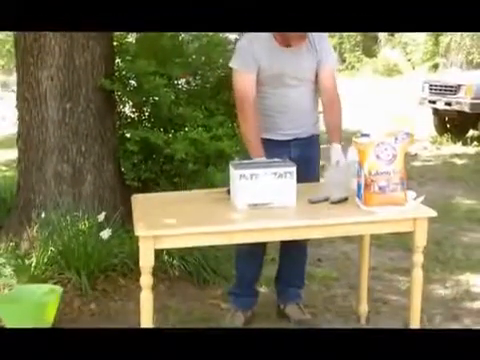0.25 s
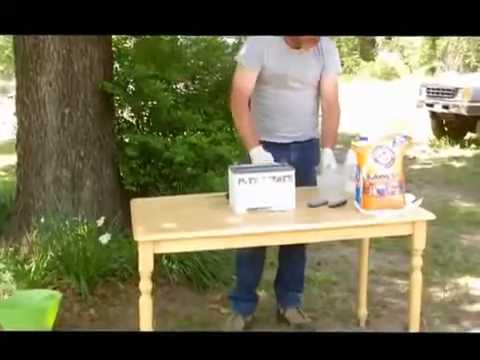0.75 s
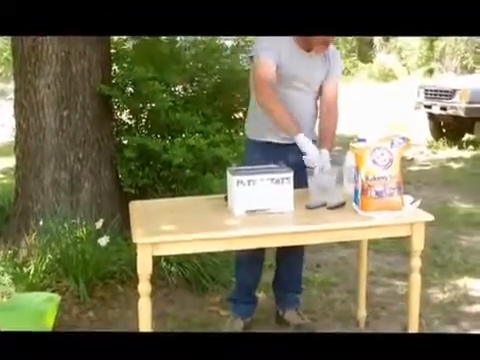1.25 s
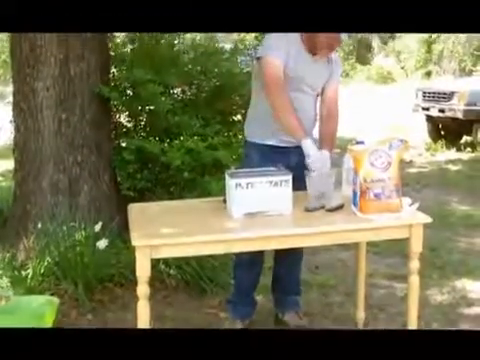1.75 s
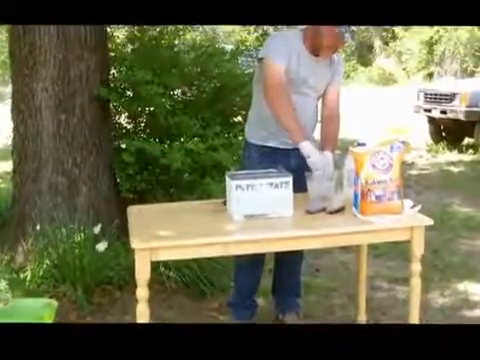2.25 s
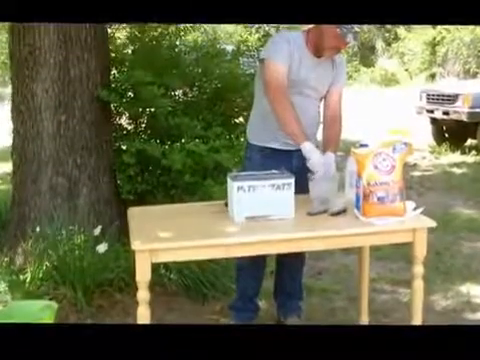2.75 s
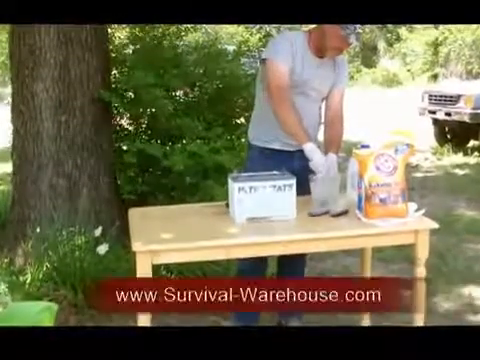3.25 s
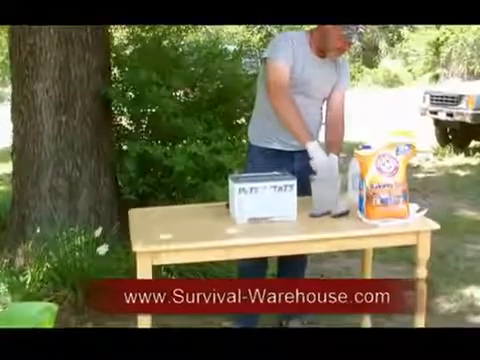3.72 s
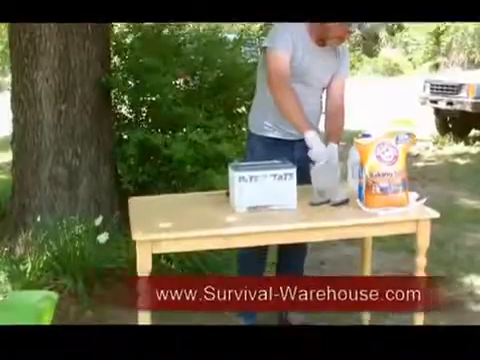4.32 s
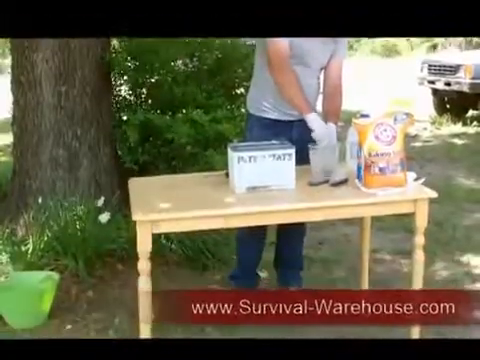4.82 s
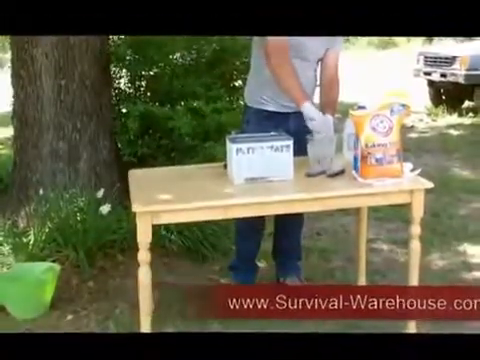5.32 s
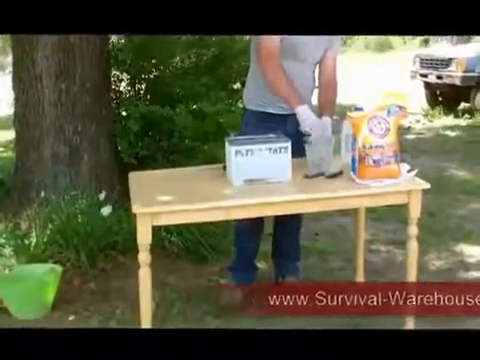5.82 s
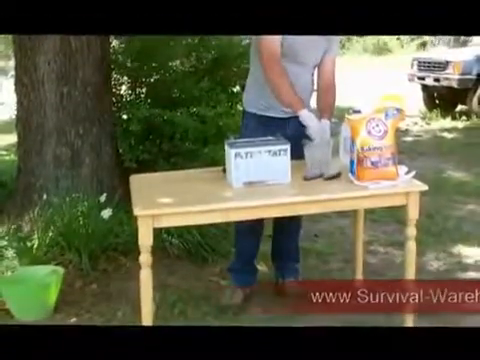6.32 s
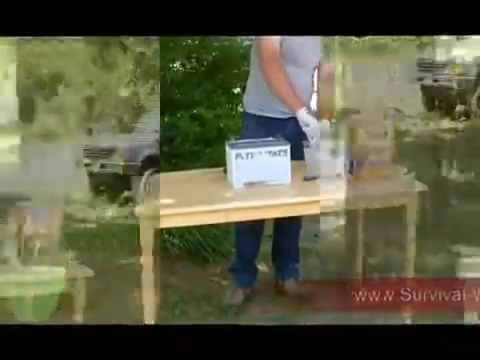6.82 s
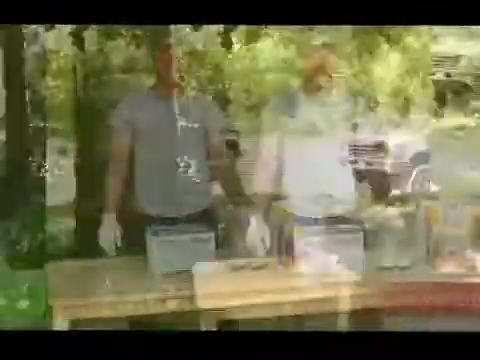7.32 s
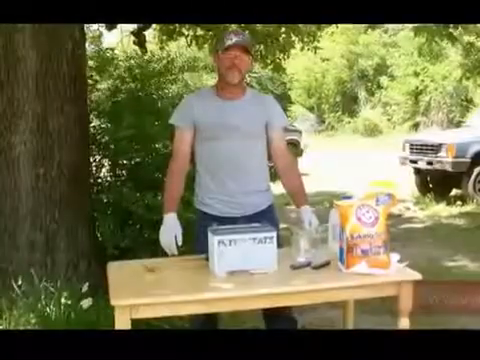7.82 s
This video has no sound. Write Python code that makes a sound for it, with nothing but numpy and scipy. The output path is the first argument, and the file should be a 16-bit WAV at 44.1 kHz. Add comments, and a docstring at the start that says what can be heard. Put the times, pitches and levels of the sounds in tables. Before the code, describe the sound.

A faint wooden scrape and a dull rattling knock lead into busy stirring: a spoon strikes the inside of a wet glass jar irregularly, grinding undissolved grains and making plops and gliding bubble tones. The sound is close, dry and slightly dull, outdoors with little echo, and heard on the left. Steady yard noise, hiss and a faint fluttering buzz continue underneath, quieter after the stirring is abruptly cut near the end.

```python
"""Outdoors in a yard: a spoon knocks and drags on a wooden table, then stirs a water-filled glass jar.
Filtered grit and noise knocks give the table; from 1.4 s decaying modes give clinks and glass rings,
gliding tones give bubbles, and grit through the clink modes gives the rub along the glass.
At 7.1 s a cut leads to a quieter moment with no stirring. One microphone feeds the left channel only;
yard noise lies behind it, and both channels carry the camera's hiss and a buzz at its frame rate."""
import sys
import numpy as np
from scipy import signal
from scipy.fft import rfft, irfft
from scipy.io import wavfile
from scipy.ndimage import uniform_filter1d

SR = 44100
rng = np.random.default_rng(int(sys.argv[2]) if len(sys.argv) > 2 else 0)


def pcm_store(signal):
    """Save signal as 16-bit PCM."""
    levels = np.round(np.clip(np.atleast_2d(signal), -1, 1) * 32767)
    wavfile.write(sys.argv[1], SR, levels.astype(np.int16).T)


N = 355446
TIME = np.arange(N) / SR
CUT_S = 7.103

# Source levels are settings ahead of the layer gains and the microphone.
# yard background, spectral shape: hz [Hz], density_db [dB per Hz, relative]
YARD_SPECTRUM = [(59, -43), (100, -44), (514, 0), (709, -7), (1050, -3), (1130, -49), (1780, -35),
                 (2000, -3.5), (9000, -30.5), (11700, -53), (19800, -120)]
YARD_DB, YARD_AFTER_DB = -67, -70.5  # before and after the cut
# camera hiss, spectral shape: hz [Hz], density_db [dB per Hz, relative]
HISS_SPECTRUM = [(25, -14), (60, -11), (130, -9), (300, -3.5), (1000, 0), (3000, -5), (6000, -7),
                 (10000, -8), (14800, -10), (15600, -59), (16400, -40)]
HISS_DB, HISS_AFTER_DB, HISS_LEFT_DB = -62, -64, -1  # left is relative to right
HISS_SHARED = 0.45  # share of hiss power common to both channels
# resonances of the camera buzz: centre_hz [Hz], width_hz [Hz], level_db [dB]
BUZZ_MODES = [(242, 92, 1.5), (528, 590, 14), (930, 1750, 3.5), (2200, 2600, -7)]
FRAME_HZ = 29.968
BUZZ_START_S, BUZZ_START_AFTER_S = .0237, .0028  # offset of the bursts before and after the cut
BUZZ_DB, BUZZ_AFTER_DB, BUZZ_LEFT_DB = -63, -65, -6  # left is relative to right

# spoon strokes over the table: start_s [s], full_from_s [s], full_until_s [s], end_s [s], level_db [dB]
DRAG_STROKES = [(0.293, 0.36, 0.37, 0.47, -50.5), (0.45, 0.54, 0.55, 0.61, -55),
                (0.65, 0.69, 0.66, 1.01, -54.5), (0.743, 0.85, 1.01, 1.8, -52.5)]
DRAG_SWELL_DB = 22.5  # how far a stroke lies below full at its start and end
# resonances of the dragged table top: centre_hz [Hz], width_hz [Hz], level_db [dB]
TABLE_MODES = [(367, 290, -4), (510, 304, 8.5), (830, 910, -3), (1180, 98, 2.5), (1770, 81, 0.5),
               (2400, 38, 2), (3340, 450, -5), (5400, 1200, -10)]
# knocks on the table: start_s [s], level_db [dB peak], t60_s [s]
TABLE_KNOCKS = [(0.408, -60, 0.075), (0.626, -31, 0.055), (0.666, -38, 0.059), (0.679, -46, 0.056)]
# resonances of the knocked wood: centre_hz [Hz], width_hz [Hz], level_db [dB]
KNOCK_MODES = [(450, 160, 24.5), (950, 250, 22.5), (1390, 160, 12), (2100, 130, 3), (3340, 400, -4)]
# thin faint tones, the low one perhaps the spoon singing: start_s [s], end_s [s], kind, level_db [dB]
WHISTLE_TONES = [(0.35, .42, "high", -77), (0.538, 0.733, "high", -63), (1.384, 1.52, "low", -59),
                 (1.629, 1.772, "low", -58), (1.883, 1.957, "low", -61), (3.423, 3.48, "low", -75),
                 (3.612, 3.733, "low", -55), (3.87, 3.947, "low", -52.5), (4.099, 4.18, "low", -52)]
# pitch of each kind of thin tone: kind, pitch_hz [Hz]
WHISTLE_HZ = {"low": 2420, "high": 6720}

# single large bubbles: start_s [s], level_db [dB peak], pitch_hz [Hz], end_over_start [ratio], t60_s [s]
LARGE_BUBBLES = [(1.541, -30, 2627, 0.99, 0.084), (1.575, -36, 2660, 0.95, 0.094),
                 (2.03, -20.5, 1636, 0.74, 0.022), (2.065, -22, 1537, 0.97, 0.038),
                 (2.149, -39, 1084, 0.98, .06), (2.479, -35, 1750, 0.85, 0.025),
                 (2.559, -32.5, 1680, 0.88, 0.024), (2.589, -38.5, 2280, 1.1, 0.041),
                 (2.6, -36, 1044, 1.05, 0.06), (2.635, -39, 1030, 0.96, .05),
                 (2.747, -31, 1116, 0.85, 0.042), (2.863, -33, 450, 1, 0.059),
                 (2.926, -14.5, 747, 3.64, 0.09), (2.984, -32.5, 632, 0.94, 0.07),
                 (3.025, -38, 1174, 0.9, .06), (3.078, -38, 627, 1.02, .06),
                 (3.297, -28.5, 1070, 1.1, 0.041), (3.395, -26.5, 588, 0.79, 0.062),
                 (4.115, -24.5, 950, 1.6, 0.083), (4.176, -25.5, 894, 1.54, 0.056),
                 (4.228, -35, 2100, 2, 0.023), (4.255, -36, 2720, 0.82, 0.036),
                 (4.301, -18, 1860, 0.86, 0.032), (4.46, -28, 1200, 0.83, 0.044),
                 (4.646, -29, 958, 1.15, 0.093), (4.781, -25.5, 1815, 1.3, 0.034),
                 (5.063, -29.5, 2020, 0.79, 0.02), (5.096, -19.5, 2200, 1.4, 0.012),
                 (5.16, -30.5, 1750, 1.2, 0.027), (5.18, -28, 1680, 0.75, 0.035),
                 (5.207, -19, 950, 1.46, 0.053), (5.33, -39.5, 567, 0.92, 0.14),
                 (5.511, -33, 1390, 0.81, 0.035), (5.545, -39, 1600, 1.1, 0.043),
                 (5.565, -35.5, 1750, .95, 0.032), (6.213, -26, 680, 0.87, 0.064),
                 (6.48, -28, 1087, 1.4, 0.073), (6.51, -30, 1127, 1.08, 0.055),
                 (6.532, -34, 1140, 1.02, .04), (6.656, -30.5, 620, 1.83, 0.058),
                 (6.799, -44, 1544, 0.65, 0.12), (6.828, -22.5, 2400, 1.3, 0.02),
                 (6.98, -16, 995, 1.11, 0.072), (7.004, -30.5, 1210, 3.9, 0.044),
                 (7.054, -38, 2000, 1.05, 0.033), (7.075, -34, 1540, 1.3, 0.043)]
# effort of the stirring hand: time_s [s], gurgle_db [dB], rub_db [dB]
STIR_EFFORT = [(1.4, -62, -74), (1.55, -53.5, -54), (1.9, -65, -78), (2.0, -49, -55), (2.35, -68, -69),
               (2.65, -60.5, -54), (3.0, -47, -93), (3.2, -62.5, -63), (3.45, -49.5, -61),
               (3.75, -58, -56.5), (4.0, -61, -59), (4.1, -52, -56), (4.3, -50.5, -54.5), (4.5, -69, -58),
               (5.0, -58, -68), (5.3, -57.5, -56), (5.83, -56, -68), (6.2, -73, -83), (6.5, -57.5, -55),
               (6.93, -57, -73), (7.04, -51, -65), (7.1, -52, -51)]
# long modes of the glass wall: pitch_hz [Hz]
WALL_MODE_HZ = [845, 2162]
# their die-away: t60_s [s]
WALL_MODE_T60_S = [0.58, 0.23]
# tuning of the wall through the stirring: time_s [s], pitch_ratio [ratio]
WALL_PITCH = [(1.5, 1.04), (1.75, 1.0), (2.0, 1.003), (2.35, .97), (3.5, .985), (4.5, .965), (7.0, .975)]
# rings of the glass wall: start_s [s], low_mode_db [dB], high_mode_db [dB], free_s [s before damping]
WALL_RINGS = [(1.537, -43, -55, 0.083), (1.575, -47, -39.5, 0.08), (1.782, -33, -61, 0.3),
              (1.946, -35, -31, 0.13), (2.328, -43.5, -35.5, 0.21), (2.443, -44.5, -45, 0.11),
              (3.473, -50, -46, 0.13), (3.76, -40.5, -45, 0.098), (4.075, -36.5, -42, 0.067),
              (4.455, -45, -39, 0.047), (4.561, -65, -38.5, 0.15), (4.811, -48.5, -51, 0.086),
              (5.253, -36, -37, 0.011), (6.235, -40, -57, 0.2), (6.421, -51, -47, 0.11)]
# spoon blows: start_s [s], level_db [dB peak], low_hz [Hz] and high_hz [Hz] favoured modes,
# bass_db [dB] and treble_db [dB] colour, t60_s [s], contact_s [s rise]
SPOON_BLOWS = [(1.368, -30.5, 1520, 6050, -18, -12, 0.039, 0.002),
               (1.536, -29, 2590, 5800, -30, -10.5, 0.034, 0.0016),
               (1.572, -39, 2400, 5960, -26, -7, 0.031, 0.002),
               (1.593, -43, 2110, 4160, -21, -12, 0.051, 0.0022),
               (1.781, -19.5, 1246, 3730, -16.5, -11, 0.041, 0.0022),
               (1.946, -14, 2660, 5820, -30.5, -7, 0.017, 0.0016),
               (1.955, -29, 2196, 3550, -37, -11.5, 0.095, 0.0025),
               (2.031, -36, 1513, 3700, -20, -38, 0.056, 0.002),
               (2.066, -31.5, 1584, 3810, -17, -17, 0.034, 0.0017),
               (2.139, -42.5, 1090, 2880, -10, -14, 0.039, 0.002),
               (2.291, -51, 2320, 4400, 4, 2, 0.021, 0.002),
               (2.328, -13, 1170, 4960, -29.5, -10, 0.027, 0.0019),
               (2.388, -39.5, 1015, 3070, -21, -19, 0.035, 0.0026),
               (2.442, -24, 942, 4720, -14, -9.5, 0.035, 0.0021),
               (2.562, -42.5, 1178, 4900, -22, -33, 0.071, 0.0018),
               (2.846, -34, 950, 6280, -7.5, -12, 0.035, 0.0018),
               (2.921, -27, 930, 3790, -16, -12.5, 0.03, 0.0015),
               (3.073, -38.5, 1160, 3010, -16.5, -20, 0.049, 0.0022),
               (3.173, -42.5, 1480, 3620, -19, -16.5, 0.039, 0.0023),
               (3.276, -38.5, 2590, 3070, -23, -16, 0.094, 0.0024),
               (3.3, -40, 1120, 4850, -31, -19, 0.027, 0.002),
               (3.312, -35, 1224, 3600, -16.5, -19.5, 0.075, 0.0025),
               (3.392, -27.5, 1270, 4850, -11, -15.5, 0.032, 0.0019),
               (3.474, -24, 904, 4780, -18, -11, 0.038, 0.002),
               (3.596, -35.5, 2160, 3730, -12.5, -19, 0.036, 0.0014),
               (3.715, -31.5, 2600, 6630, -30, -22.5, 0.068, 0.0025),
               (3.758, -19.5, 2340, 5150, -13.5, -8, 0.022, 0.0012),
               (3.814, -31, 851, 4840, -21, -3.5, 0.051, 0.0023),
               (3.925, -34, 1042, 5120, -22, -8.5, 0.054, 0.002),
               (3.942, -31, 2276, 3230, -32, -12.5, 0.032, 0.0028),
               (4.066, -36.5, 940, 3460, -12, -8, 0.028, 0.0018),
               (4.075, -26, 1084, 5290, -17, -14.5, 0.062, 0.0014),
               (4.11, -23.5, 965, 2970, -10, -7.5, 0.032, 0.0011),
               (4.166, -26.5, 2700, 5220, -19.5, -9, 0.058, 0.0022),
               (4.22, -27, 2100, 5470, -15.5, -18, 0.032, 0.0032),
               (4.233, -35.5, 2560, 3080, -36, -39, 0.033, 0.0014),
               (4.298, -17, 2040, 4610, -22, -11.5, 0.021, 0.002),
               (4.395, -33, 2560, 6800, -17, -5, 0.033, 0.002),
               (4.41, -25, 1014, 7100, -11.5, -14.5, 0.026, 0.003),
               (4.455, -23.5, 1168, 3370, -12.5, -6.5, 0.034, 0.0017),
               (4.56, -14, 2370, 5440, -18.5, -13, 0.029, 0.0019),
               (4.644, -32.5, 978, 2810, -21, -20.5, 0.058, 0.0048),
               (4.781, -31.5, 1750, 6300, -23, -1, 0.033, 0.0019),
               (4.796, -31, 856, 3540, -10.5, -5, 0.034, 0.002),
               (4.812, -24, 1160, 4990, -16.5, -22, 0.019, 0.0022),
               (4.972, -36.5, 2450, 4470, -18, -12.5, 0.031, 0.002),
               (5.007, -40, 2400, 6310, -19, -11, 0.037, 0.0014),
               (5.063, -45, 2000, 3470, -25, -16, 0.038, 0.002),
               (5.13, -44.5, 1110, 5030, -36, -23, 0.045, 0.0018),
               (5.16, -43.5, 1617, 4770, -22, -34, 0.081, 0.0022),
               (5.211, -26, 1000, 6490, -29.5, -42, 0.02, 0.0016),
               (5.253, -20, 940, 4830, -23.5, -21.5, 0.024, 0.0021),
               (5.295, -38, 991, 3660, 4, -2, 0.053, 0.0026),
               (5.375, -28.5, 2490, 6130, -33, -7, 0.024, 0.0017),
               (5.397, -40, 2250, 3570, -26, -10.5, 0.029, 0.002),
               (5.414, -46, 899, 4730, -34, -36, 0.023, 0.0016),
               (5.506, -42, 1400, 5070, -33, -44, 0.057, 0.002),
               (5.536, -45, 907, 3340, -30, -31, 0.051, 0.0017),
               (5.623, -41.5, 1220, 2980, -35, -15, 0.025, 0.002),
               (5.673, -39.5, 1010, 4800, -27, -12, 0.026, 0.0016),
               (5.684, -38.5, 840, 6500, -29, -9, 0.031, 0.002),
               (5.696, -28.5, 1710, 7200, -33, -22.5, 0.035, 0.0013),
               (5.745, -34.5, 1080, 3820, -14, -18, 0.035, 0.002),
               (5.836, -45.5, 977, 6700, -5, -6, 0.036, 0.0025),
               (5.874, -41.5, 1274, 4130, -19.5, -24, 0.088, 0.0018),
               (5.902, -26.5, 2278, 3650, -28.5, -19.5, 0.025, 0.0017),
               (5.969, -22, 1200, 3550, -16.5, -5.5, 0.028, 0.0021),
               (6.121, -26, 2070, 3050, -17, -7.5, 0.032, 0.0021),
               (6.146, -42, 1670, 4580, -23.5, -11, 0.033, 0.0022),
               (6.213, -25, 905, 3300, -17, -28, 0.018, 0.0021),
               (6.235, -7.5, 2400, 3130, -28.5, -12.5, 0.014, 0.0019),
               (6.281, -32.5, 851, 2940, -19, -18, 0.029, 0.002),
               (6.42, -23.5, 1774, 3750, -27.5, -8.5, 0.034, 0.0023),
               (6.429, -33, 854, 3920, -17, -2, 0.033, 0.0023),
               (6.48, -27.5, 1058, 4920, -41, -34.5, 0.028, 0.0027),
               (6.537, -34.5, 870, 3230, -13, -5, 0.026, 0.0018),
               (6.548, -48, 1150, 6960, -20, -7, 0.033, 0.002),
               (6.584, -37.5, 2140, 4380, -27, -2, 0.023, 0.002),
               (6.64, -33, 840, 3790, -7.5, -0.5, 0.031, 0.0012),
               (6.796, -45, 1570, 3300, -19, -17, 0.039, 0.002),
               (6.828, -30.5, 2300, 4080, -26, -22, 0.033, 0.002),
               (6.883, -42, 1610, 5960, -18, -48, 0.023, 0.002),
               (6.98, -22, 994, 6280, -33.5, -18, 0.028, 0.0025)]
# quickly damped modes of spoon, water and jar: pitch_hz [Hz], level_db [dB], t60_ratio [times the blow's t60]
CLINK_MODES = [(299.3, -1, 4.4), (441.5, 2.5, 4.8), (616.8, 14.5, 3.73), (884, 7, 3.24), (1043, 7, 1.88),
               (1220, -1, 4.5), (1600, 3.5, 2.44), (1835, -6, 0.88), (2340, 9.5, 1.71), (2540, 9, 1.35),
               (2758, -4, 3.14), (3150, 8, 0.52), (3830, 1, 2.35), (4140, -28, 0.82), (4900, 11.5, 1.16),
               (5630, 5.5, 1.27), (6050, 13.5, 0.72), (6665, 20.5, 0.46), (7440, 16.5, 0.51),
               (8540, 15, 0.36), (9856, 10, 0.54)]
# a blow's colour runs from its bass through its low and high modes up to the air
BASS_HZ, AIR_HZ = 600, 9000
LOW_MODE_DB, AIR_DROP_DB = -7, 7.5

MIC_LOW_HZ, MIC_HIGH_HZ = 233, 11800
TOP_HZ = 16450  # upper limit of the camera


def undb(db):
    """Gain of a dB value."""
    return 10 ** (np.asarray(db) / 20)


def unit(x):
    """Scale to rms 1."""
    return x / np.sqrt(np.mean(x ** 2))


def curve(time_s, level_db):
    """Gain interpolated in dB between points; practically silent outside them."""
    return undb(np.interp(TIME, time_s, level_db, left=-200, right=-200))


def step(before_db, after_db):
    """Gain that jumps at the cut."""
    return np.where(TIME < CUT_S, undb(before_db), undb(after_db))


def noise(spectrum):
    """Noise of rms 1, its spectrum shaped by (Hz, dB) points on a log frequency scale."""
    hz, db = np.transpose(spectrum)
    f = np.arange(1, N // 2 + 2) * SR / N
    shape = undb(np.interp(np.log(f), np.log(hz), db))
    return unit(irfft(rfft(rng.standard_normal(N)) * shape, N))


def gritty(depth_db, smooth):
    """White noise whose level wavers fast, like a rough contact; smooth is in samples."""
    grains = rng.standard_normal(N)
    waver = unit(uniform_filter1d(rng.standard_normal(N), size=smooth))
    return grains * undb(depth_db * waver)


def body(x, modes):
    """Sum of parallel resonances, each applied twice for steep skirts."""
    out = 0
    for hz, width, db in modes:
        b, a = signal.iirpeak(hz, hz / (1.53 * width), SR)  # widened, as two passes narrow the peak
        out = out + undb(db) * signal.lfilter(b, a, signal.lfilter(b, a, x))
    return out


def fade(t, t60):
    """Exponential die-away, 60 dB in t60."""
    return np.exp(-np.log(1000) * t / t60)


def add(out, s, sound):
    """Mix a sound in at time s."""
    i = int(s * SR)
    out[i:i + len(sound)] += sound[:len(out) - i]


def yard():
    """Steady coloured noise of the open air, quieter after the cut."""
    return noise(YARD_SPECTRUM) * step(YARD_DB, YARD_AFTER_DB)


def hiss():
    """Camera hiss, partly shared by the channels and louder on the unloaded right input."""
    shared = np.sqrt(HISS_SHARED) * noise(HISS_SPECTRUM)
    sides = [shared + np.sqrt(1 - HISS_SHARED) * noise(HISS_SPECTRUM) for _ in range(2)]
    return np.array(sides) * step(HISS_DB, HISS_AFTER_DB) * undb([[HISS_LEFT_DB], [0]])


def buzz(burst_s=0.0058, fresh=1.0, spread_db=-1.5, early_s=.006, early=2.0):
    """Once a frame a short burst of sparks, partly the same each time, rings broad resonances."""
    size = int(burst_s * SR)

    def sparks():
        """Sparse random impulses."""
        return rng.standard_normal(size) * (rng.random(size) < .03)

    out, same = np.zeros(N), sparks()
    for k in range(int(FRAME_HZ * N / SR)):
        s = k / FRAME_HZ + BUZZ_START_S
        if s > CUT_S + 1 / FRAME_HZ:
            s += BUZZ_START_AFTER_S - BUZZ_START_S
        add(out, s, undb(spread_db * rng.standard_normal()) * (same + fresh * sparks()))
        if k % 3 == 0:  # every third burst has a lone spark ahead of it
            out[int((s - early_s) * SR)] -= early
    mono = unit(body(out, BUZZ_MODES)) * step(BUZZ_DB, BUZZ_AFTER_DB)
    return mono * undb([[BUZZ_LEFT_DB], [0]])


def whistles(flutter_db=1.5):
    """Thin sine tones with soft ends and a fluttering level."""
    out = np.zeros(N)
    for start, end, kind, db in WHISTLE_TONES:
        t = np.arange(int((end - start) * SR)) / SR
        tone = np.sin(2 * np.pi * WHISTLE_HZ[kind] * t)
        add(out, start, undb(db) * signal.windows.tukey(len(t), .4) * tone)
    return out * undb(flutter_db * unit(uniform_filter1d(rng.standard_normal(N), size=700)))


def table_drag(gain_db=5.0):
    """Grit under the dragged spoon rings the table top, swelling with each stroke."""
    strokes = np.zeros(N)
    for *times, db in DRAG_STROKES:
        strokes += curve(times, [db - DRAG_SWELL_DB, db, db, db - DRAG_SWELL_DB])
    return unit(body(gritty(5.0, 60), TABLE_MODES)) * strokes * undb(gain_db)


def table_knocks(gain_db=8.0, rise_s=0.0019):
    """Short noise bursts through the wood's resonances."""
    out, t = np.zeros(N), np.arange(4000) / SR
    for s, peak_db, t60 in TABLE_KNOCKS:
        knock = body(rng.standard_normal(4000), KNOCK_MODES) * fade(t, t60) * np.minimum(t / rise_s, 1)
        add(out, s, undb(peak_db + gain_db) * knock / np.abs(knock).max())
    return out


def bubble(hz, rise, t60):
    """A dying tone that glides to rise times its starting pitch, as a bubble's resonance does."""
    t = np.arange(int(t60 * SR)) / SR
    phase = 2 * np.pi * hz * (t + (rise - 1) * t ** 2 / (2 * t60))
    return np.sin(phase) * fade(t, t60) * np.minimum(t / (0.11 * t60), 1)


def after_blows(share, level_db, t60):
    """A gain that leaps at every blow and dies away; share scales the blow's dB level."""
    out, t = np.zeros(N), np.arange(15000) / SR
    for s, peak_db, *_ in SPOON_BLOWS:
        add(out, s, undb(share * peak_db + level_db) * fade(t, t60))
    return out


def water(count=1500, size_db=2.0, centre_hz=1200., octaves=0.595, gurgle_db=-4.0):
    """Large bubbles one by one over a gurgle of small ones, which every blow stirs up for a moment."""
    out, gurgle = np.zeros(N), np.zeros(N)
    for s, peak_db, hz, rise, t60 in LARGE_BUBBLES:
        add(out, s, undb(peak_db) * bubble(hz, rise, t60))
    for (when, size, cycles), pitch in zip(rng.random((count, 3)), rng.standard_normal(count)):
        hz = max(centre_hz * 2 ** (octaves * pitch), 450)
        t60 = (8 + 60 * cycles ** 2) / hz  # lasts 8 to 68 cycles
        add(gurgle, 1.4 + 5.7 * when, undb(-size_db * np.log(size)) * bubble(hz, 0.985, t60))
    time_s, effort_db, _ = np.transpose(STIR_EFFORT)
    effort = curve(time_s, effort_db) * undb(gurgle_db)
    return out + unit(gurgle) * (effort + after_blows(0.92, -27.0, 0.12))


def rub(gain_db=-2.0):
    """Undissolved grains grind between spoon and glass on the upper clink modes; each blow skids on."""
    modes = [(hz, hz / 9, -6 * np.log2(hz / 2000)) for hz, *_ in CLINK_MODES if 1000 < hz < 7000]
    time_s, _, effort_db = np.transpose(STIR_EFFORT)
    effort = curve(time_s, effort_db) * undb(gain_db)
    return unit(body(gritty(4.5, 120), modes)) * (effort + after_blows(0.75, -26.5, 0.093))


def wall(damp_s=0.014):
    """Two long modes of the glass, mostly lower in cloudy water, each ring damped after its free time."""
    out, t = np.zeros(N), np.arange(18000) / SR
    for s, *mode_db, free_s in WALL_RINGS:
        tune = np.interp(s, *np.transpose(WALL_PITCH))
        stop = np.exp(-np.maximum(t - free_s, 0) / damp_s)
        for hz, t60, db in zip(WALL_MODE_HZ, WALL_MODE_T60_S, mode_db):
            add(out, s, undb(db) * np.sin(2 * np.pi * hz * tune * t) * fade(t, t60) * stop)
    return out


def blows(spread_db=4.0, favoured_db=15.0, crack_db=-9.5, gain_db=6.5, rattle=0.68):
    """Each blow lands elsewhere: its own mix of short modes, two that it favours, and a wet crack."""
    out, t = np.zeros(N), np.arange(5000) / SR
    f = np.arange(1, 2502) * SR / 5000
    for s, peak_db, low_hz, high_hz, bass_db, treble_db, t60, contact_s in SPOON_BLOWS:
        favoured = [(low_hz, favoured_db, 1.5), (high_hz, favoured_db, 1.1)]
        hz, db, last = np.transpose(CLINK_MODES + favoured)[:, :, None]
        level_chance, pitch_chance, phase_chance = rng.standard_normal((3, len(hz), 1))
        level_chance[-2:] = pitch_chance[-2:] = 0  # no random level or pitch for the favoured modes

        colour_hz = np.log([BASS_HZ, low_hz, high_hz, AIR_HZ])
        colour_db = [bass_db, LOW_MODE_DB, treble_db, treble_db - AIR_DROP_DB]
        mode_colour = undb(np.interp(np.log(hz), colour_hz, colour_db))
        crack_colour = undb(np.interp(np.log(f), colour_hz, colour_db))

        # water and a chattering spoon make every mode flutter on its own
        chatter = rng.standard_normal((len(hz), 50)).repeat(100, axis=1)
        flutter = 1 + rattle * unit(uniform_filter1d(chatter, size=100))
        modes = mode_colour * undb(db + spread_db * level_chance) * fade(t, t60 * last) * flutter
        tones = np.sin(2 * np.pi * hz * (1 + 0.019 * pitch_chance) * t + 3 * phase_chance)
        clink = np.sum(modes * tones, axis=0)

        crack_spectrum = rfft(rng.standard_normal(5000)) * crack_colour / np.sqrt(f + 300)
        crack = unit(irfft(crack_spectrum, 5000)) * fade(t, 0.98 * t60)
        hit = clink / np.abs(clink).max() + undb(crack_db) * crack
        add(out, s, undb(peak_db + gain_db) * hit * np.minimum(t / contact_s, 1))
    return out


def surroundings(near):
    """Add an echo off the table, 330 samples late, and a faint scatter off tree and bushes."""
    t = np.arange(9000) / SR
    scatter = rng.standard_normal(len(t)) * fade(t, 0.19) * np.minimum(t / 0.031, 1)
    echo = undb(-18.5) * np.roll(near, 330)
    return near + echo + undb(-45.5) * signal.fftconvolve(near, scatter)[:N]


def scene():
    """All that reaches the microphone, on the left; table, spoon and jar end at the cut."""
    near = blows() + wall() + rub() + water() + table_drag() + table_knocks()
    close = (surroundings(near) + whistles()) * (TIME < CUT_S)
    return np.array([close + yard(), np.zeros(N)])


def record(dry):
    """A small microphone loses bass and top; the camera adds hiss and buzz, then cuts the top."""
    dry = signal.sosfilt(signal.butter(4, MIC_LOW_HZ, "high", fs=SR, output="sos"), dry)
    dry = signal.sosfilt(signal.butter(2, MIC_HIGH_HZ, fs=SR, output="sos"), dry)
    wet = dry + hiss() + buzz()
    return signal.sosfilt(signal.ellip(10, .2, 70, TOP_HZ, fs=SR, output="sos"), wet)


dry = scene()
out = record(dry)
pcm_store(out)
```